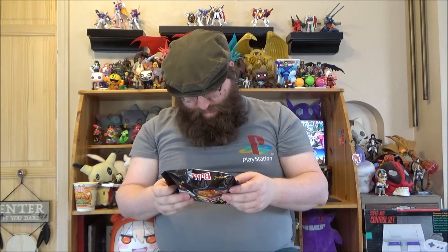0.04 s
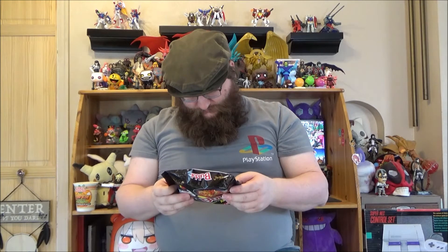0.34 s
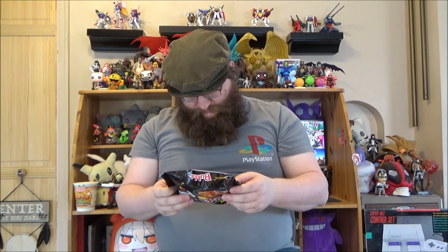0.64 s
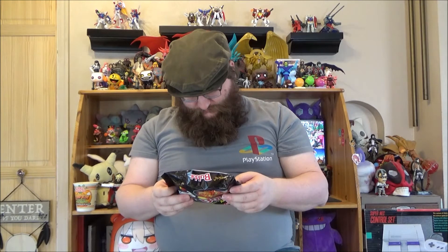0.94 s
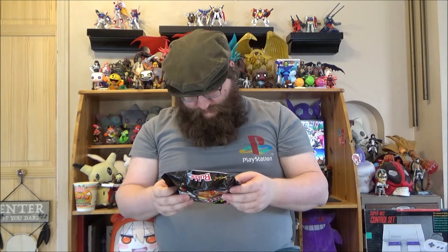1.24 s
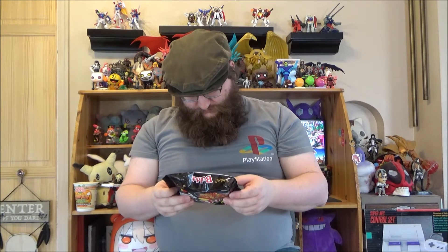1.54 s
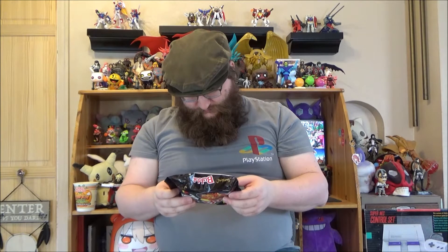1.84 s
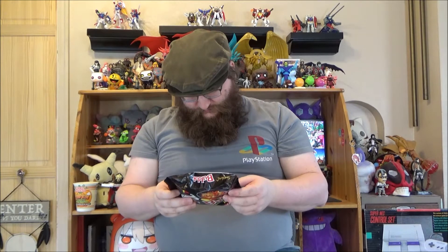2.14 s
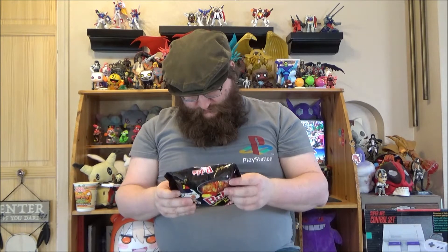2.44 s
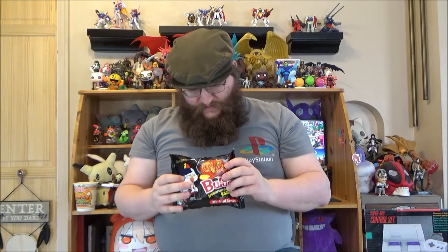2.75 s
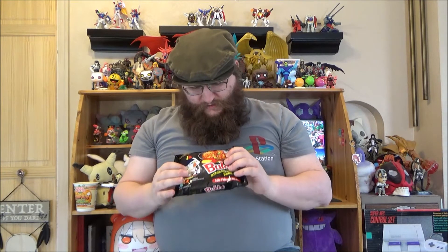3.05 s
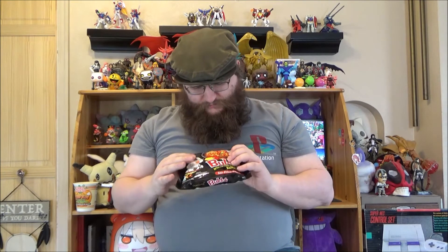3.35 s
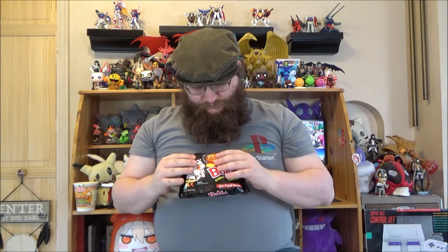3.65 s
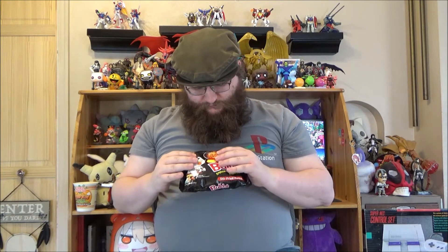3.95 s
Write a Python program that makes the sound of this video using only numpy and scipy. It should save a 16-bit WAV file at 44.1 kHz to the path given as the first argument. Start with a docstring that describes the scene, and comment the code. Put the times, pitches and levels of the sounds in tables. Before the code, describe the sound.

A plastic noodle packet crinkles in someone's hands, about a metre away in a small room. The first second holds only a few faint ticks. From about 1.3 seconds, scattered crisp snaps and soft fingertip taps gather. Around 2.3 seconds the crackling turns loud and dense with dull rubbing, eases near 3 seconds, then swells again from 3.4 to 4 seconds. Faint hiss and hum lie underneath.

```python
"""A small furnished room: a plastic noodle packet is gripped, then turned and squeezed about a metre away.
Creases in the film snap through one by one and ring the air-filled bag. Harder handling adds a dense
crackle of tiny creases and a dull rub of fingers and noodle block. Two snaps and three fingertip taps
give soft dull knocks. Behind it are soft hiss, mains hum and a faint pulsing electronic whine."""
import sys
import numpy as np
from scipy import signal
from scipy.fft import rfft, irfft
from scipy.io import wavfile
from scipy.ndimage import uniform_filter1d

SR = 44100
rng = np.random.default_rng(int(sys.argv[2]) if len(sys.argv) > 2 else 0)


def to_wav(sig):
    """Store sig (one row per channel, or 1-D mono) as 16-bit WAV at the path in sys.argv[1].

    Samples outside -1..1 are clipped; the rate is SR.
    """
    pcm = np.clip(np.atleast_2d(sig), -1, 1) * 32767
    pcm = np.round(pcm).astype(np.int16)
    wavfile.write(sys.argv[1], SR, pcm.T)  # frames by channels


N = 176400

# how hard the film is worked: time_s, effort_db
FILM_EFFORT = [(0, -48.5), (.035, -41), (.06, -47), (1.29, -52.5), (1.885, -60), (1.90, -21), (1.95, -62),
               (2.08, -55), (2.14, -36.5), (2.39, -45), (2.44, -66), (2.515, -43), (2.555, -18.5),
               (2.59, -24), (2.635, -28.5), (2.70, -29), (2.76, -37), (2.84, -27.5), (2.93, -35),
               (3.11, -33.5), (3.195, -38.5), (3.245, -30), (3.32, -38), (3.395, -50), (3.42, -28.5),
               (3.48, -22.5), (3.57, -32), (3.69, -27), (3.76, -28), (3.89, -39), (3.92, -26.5),
               (3.97, -43.5), (4, -37)]
# bands of the four sizes of tiny crease: edge_hz
CREASE_EDGES_HZ = [100, 1300, 3000, 6500, 17000]
# crackle spectrum: freq_hz, relative_db
CRACKLE_SPECTRUM = [(100, -36), (280, -23.5), (380, -4), (1150, -4.5), (1900, -1), (4500, -2.5),
                    (8500, -5.5), (10500, -11), (13000, -19), (16000, -50)]
# resonances of the air-filled bag: freq_hz, width_hz, relative_db
BAG_RESONANCES = [(420, 90, -7), (775, 80, -6), (1940, 240, -7), (2260, 90, -9)]
# fingers and noodle block on the film: time_s, relative_db
RUB_ENVELOPE = [(0, -67), (.07, -66), (1.3, -71.5), (1.77, -55.5), (2.06, -59), (2.17, -48), (2.4, -52.5),
                (2.48, -53), (2.58, -36.5), (2.77, -56.5), (2.88, -46), (3.19, -59), (3.38, -49.5),
                (3.46, -45.5), (3.7, -35.5), (3.85, -43), (4, -51)]
# soft dull knocks, the low body of two crease snaps, then three fingertip taps: start_s, level_db
DULL_KNOCKS = [(.267, -39.5), (1.47, -46), (1.577, -38.5), (1.808, -42), (1.827, -36)]
# rub and knock spectrum: freq_hz, relative_db
RUB_SPECTRUM = [(100, -13), (200, -12), (280, -17.5), (370, 4.5), (490, 4), (600, -7.5), (770, 3.5),
                (1100, -2.5), (2000, -2.5), (8000, -20.5)]
# room air spectrum: freq_hz, relative_db
AIR_SPECTRUM = [(20, -43), (64, -6), (92, -21.5), (123, 0), (153, -7), (249, -13), (309, -17), (887, -21),
                (1840, -25), (3920, -28.5), (16000, -36.5)]
# room air stereo width: freq_hz, side_to_mid_db
AIR_SPREAD = [(60, -37), (170, -17), (600, 0), (4400, -2), (12000, -22)]
# appliance hum: freq_hz, rms_db
HUM_TONES = [(120, -60.5), (250, -65), (900, -69.5)]
# creases snapping through: start_s, level_db, pitch_hz
CREASE_SNAPS = [(.0026, -31, 3350), (.018, -31.5, 4140), (0.0258, -27.5, 3700), (0.2667, -32, 6900),
                (0.7201, -50, 2200), (0.7419, -41, 2870), (1.309, -41, 4300), (1.3485, -45.5, 7050),
                (1.3888, -35, 5860), (1.4681, -33.5, 5840), (1.564, -34.5, 2470), (1.5742, -41.5, 1920),
                (1.696, -25.5, 3700), (1.7557, -36, 4130), (1.8209, -34, 6700), (1.8956, -24, 4930),
                (1.9272, -27, 3460), (1.9792, -33.5, 2700), (2.09, -32.5, 1830), (2.1149, -27.5, 5400),
                (2.1753, -28, 3850), (2.185, -27.5, 5570), (2.2432, -26.5, 4070), (2.2922, -31.5, 6540),
                (2.3180, -22.5, 2650), (2.3384, -16.5, 7460), (2.3776, -25, 4050), (2.3972, -22.5, 3950),
                (2.4987, -26.5, 3160), (2.5403, -24, 4200), (2.548, -22.5, 6800), (2.5524, -23.5, 11000),
                (2.5566, -20.5, 2290), (2.564, -18.5, 3620), (2.5743, -17, 3250), (2.5913, -19.5, 2380),
                (2.597, -17.5, 4400), (2.6457, -15, 9400), (2.6648, -12.5, 7200), (2.6807, -14.5, 4460),
                (2.6989, -19, 8500), (2.7028, -15, 8300), (2.769, -35.5, 11500), (2.852, -23.5, 6900),
                (2.877, -22.5, 6200), (2.8872, -24, 4960), (2.9493, -24, 4000), (2.9789, -22.5, 3700),
                (3.0315, -32.5, 2080), (3.0700, -17.5, 3700), (3.153, -23.5, 5500), (3.2154, -31.5, 5100),
                (3.308, -31.5, 3580), (3.3415, -25.5, 6100), (3.4074, -14.5, 5500), (3.4164, -19.5, 4140),
                (3.5087, -15.5, 3270), (3.5271, -19.5, 8200), (3.5598, -20, 3080), (3.6078, -19.5, 5400),
                (3.6186, -40, 4500), (3.6388, -12.5, 5170), (3.6533, -18, 8000), (3.6555, -17.5, 8200),
                (3.680, -19, 3100), (3.686, -15.5, 3550), (3.7031, -17, 3300), (3.7102, -14, 5630),
                (3.7514, -23, 5600), (3.7552, -16, 5200), (3.7633, -15.5, 7650), (3.7682, -19, 2620),
                (3.8027, -13, 8050), (3.8085, -17.5, 5600), (3.8429, -18, 4600), (3.8645, -24.5, 3500),
                (3.8816, -21, 10500), (3.9038, -13.5, 7700), (3.9396, -25, 5860)]
# spectrum common to all snaps: freq_hz, relative_db
SNAP_SPECTRUM = [(100, -20), (300, -2), (700, 1), (1200, 2), (1900, 6), (2800, 0.5), (4500, -4),
                 (8500, -1.5), (10500, -3), (13000, -9.5), (16000, -25)]
# broad and narrow peaks at a buckling facet's pitch: boost_db, width_octaves
FACET_PEAKS = [(9, 1.2), (8, .2)]
# room tail: freq_hz, t60_s, level_db, side_to_mid_db
ROOM_BANDS = [(302, 0.61, -4.5, -36), (597, 0.42, 0.5, -13), (1880, 0.2, -3.5, -8), (4320, 0.34, -4, -6),
              (9600, 0.23, -8, -20), (15200, .18, -40, -8)]

REST_START_S, REST_END_S = .07, 1.29
CRACKLE_GAIN_DB, RUB_GAIN_DB, SNAP_GAIN_DB = -3, 5, .05
CRACK_DECAY_S, SHIVER_DECAY_S, SHIVER_DB = .0007, .0019, -3
WHINE_HZ, WHINE_RATE_HZ, WHINE_FIRST_S, WHINE_WIDTH_S, WHINE_PEAK_DB = 3213, 29.92, .018, .0016, -56
ROOM_ONSET_S, EARLY_DECAY_S, DIRECT_SIDE_DB = .004, .012, -14


def undb(db):
    """Decibels to gain."""
    return 10 ** (np.asarray(db) / 20)


def curve(points, t):
    """Linear interpolation of (time_s, value) points."""
    return np.interp(t, *np.array(points).T)


def spectrum_db(points, hz):
    """Interpolation of (freq_hz, db) points on a log frequency axis."""
    point_hz, db = np.array(points).T
    return np.interp(np.log(hz + 1), np.log(point_hz), db)


def colour(x, points, size=2048):
    """Minimum-phase, unit-energy filter shaped by (freq_hz, db) points."""
    cepstrum = irfft(np.log(undb(spectrum_db(points, np.fft.rfftfreq(size, 1 / SR)))))
    cepstrum[1:size // 2] *= 2
    cepstrum[size // 2 + 1:] = 0
    impulse = irfft(np.exp(rfft(cepstrum)))
    return signal.fftconvolve(x, impulse / np.linalg.norm(impulse))[:len(x)]


def grains(rate_hz, scatter_db, decay_s):
    """Random tiny noise bursts of scattered size, mean power near 1."""
    chance, size, noise = rng.random(N), rng.standard_normal(N), rng.standard_normal(N)
    power = undb(scatter_db * np.minimum(size, 2)) ** 2
    hits = (chance < rate_hz / SR) * power / power.mean() * SR / rate_hz
    pole = np.exp(-2 / (decay_s * SR))
    return noise * np.sqrt(signal.lfilter([1 - pole], [1, -pole], hits + 1e-12))


def hands_moving(t):
    """1 while the hands move, 0 while they rest."""
    return (t < REST_START_S) | (t > REST_END_S)


def crackle(t):
    """Tiny creases come faster and louder with effort. One signal per crease size, dull to bright."""
    effort_db = curve(FILM_EFFORT, t)
    rate_hz = 800 * np.exp(.01 * (effort_db + 30))
    gain = undb(effort_db + CRACKLE_GAIN_DB) * hands_moving(t)
    bands = []
    for edges_hz in zip(CREASE_EDGES_HZ, CREASE_EDGES_HZ[1:]):
        bandpass = signal.butter(2, edges_hz, "band", fs=SR, output="sos")
        bands.append(signal.sosfilt(bandpass, gain * grains(rate_hz, scatter_db=5, decay_s=.0009)))
    return [bag_ring(colour(band, CRACKLE_SPECTRUM), ring_db=-3) for band in bands]


def bag_ring(clicks, ring_db):
    """Clicks plus the bag's resonances, tuned a little higher or lower at random as grip varies."""
    tune = 1 + .045 * rng.uniform(-.95, 1)
    ring = sum(undb(db) * signal.lfilter(*signal.iirpeak(hz * tune, hz / width_hz, fs=SR), clicks)
               for hz, width_hz, db in BAG_RESONANCES)
    return clicks + undb(ring_db) * ring


def rub_and_knocks(t, knock_decay_s=.006):
    """Fingers and noodles scrape the film in grains; two snaps and three fingertip taps knock dully."""
    gain = undb(curve(RUB_ENVELOPE, t) + RUB_GAIN_DB) * hands_moving(t)
    scrape = gain * grains(rate_hz=1100, scatter_db=6, decay_s=.0012)
    knock_envelope = sum(undb(db) * (t >= start_s) * np.exp(-np.clip(t - start_s, 0, 1) / knock_decay_s)
                         for start_s, db in DULL_KNOCKS)
    return colour(scrape + knock_envelope * rng.standard_normal(N), RUB_SPECTRUM)


def room_air(mid_rms_db=-52.5):
    """Steady soft hiss over a low rumble, near mono in the bass."""
    hz = np.fft.rfftfreq(N, 1 / SR)
    mid_bins, side_bins = rfft(rng.standard_normal((2, N))) * undb(spectrum_db(AIR_SPECTRUM, hz))
    mid = irfft(mid_bins)
    side = irfft(side_bins * undb(spectrum_db(AIR_SPREAD, hz)))
    return np.array([mid + side, mid - side]) * undb(mid_rms_db) / np.sqrt(np.mean(mid ** 2))


def mains_hum(t):
    """Appliances hum in steady tones."""
    return sum(np.sqrt(2) * undb(db) * np.sin(2 * np.pi * (hz * t + rng.random()))
               for hz, db in HUM_TONES)


def snaps(size=768, tail_size=10000):
    """A crease cracks, then its facet shivers at its own pitch; each takes a new path through the room."""
    out = np.zeros((2, N + tail_size))
    t = np.arange(size) / SR
    envelope = np.exp(-t / CRACK_DECAY_S) + undb(SHIVER_DB) * np.exp(-t / SHIVER_DECAY_S)
    hz = np.geomspace(100, 16000, 90)
    for start_s, level_db, pitch_hz in CREASE_SNAPS:
        buckle = rng.standard_normal(size) * envelope
        power = uniform_filter1d(np.abs(rfft(buckle)) ** 2, 20)
        flatten_db = -10 * np.log10(np.interp(hz, np.fft.rfftfreq(size, 1 / SR), power))
        facet_db = sum(boost_db * np.exp(-.5 * (np.log2(hz / pitch_hz) / width_octaves) ** 2)
                       for boost_db, width_octaves in FACET_PEAKS)
        snap = colour(buckle, np.c_[hz, spectrum_db(SNAP_SPECTRUM, hz) + facet_db + flatten_db])
        snap = bag_ring(np.pad(snap, (0, tail_size - size)), ring_db=-6)
        snap /= np.sqrt(np.sum(snap ** 2) / (.003 * SR))  # energy of 3 ms at unit power
        first = int(start_s * SR)
        out[:, first:first + tail_size] += undb(level_db + SNAP_GAIN_DB) * room(snap, tail_size)
    return out[:, :N]


def whine(t):
    """Faint electronic tone pulses, about thirty a second."""
    from_peak_s = (((t - WHINE_FIRST_S) * WHINE_RATE_HZ + .5) % 1 - .5) / WHINE_RATE_HZ
    pulse = np.exp(-.5 * (from_peak_s / WHINE_WIDTH_S) ** 2)
    return undb(WHINE_PEAK_DB) * pulse * np.sin(2 * np.pi * WHINE_HZ * from_peak_s)


def room(x, size=24000):
    """Direct sound, dense early reflections off shelves, then a short tail, longest in the bass."""
    t, hz = np.arange(size) / SR, np.fft.rfftfreq(size, 1 / SR)
    noise_bins = rfft(rng.standard_normal((2, size)))
    onset = np.clip(2 * t / ROOM_ONSET_S - 1, 0, 1)
    early_boost = 1 + np.exp(-t / EARLY_DECAY_S)
    log_centres = np.log([band[0] for band in ROOM_BANDS])
    impulse = np.zeros((2, size))  # mid, side
    for selector, (_, t60_s, level_db, side_db) in zip(np.eye(len(ROOM_BANDS)), ROOM_BANDS):
        band_noise = irfft(noise_bins * np.interp(np.log(hz + 1), log_centres, selector))
        fade = onset * early_boost * undb(-60 * t / t60_s)
        impulse += band_noise * fade / np.linalg.norm(fade) * undb([[level_db], [level_db + side_db]])
    impulse[0, 1] += 1
    # direct sound reaches one microphone port slightly earlier
    impulse[1, [0, 3]] += undb(DIRECT_SIDE_DB) * rng.choice([-1, 1]) * np.array([.5, -.5])
    mid, side = signal.fftconvolve(x[None], impulse, axes=1)[:, :len(x)]
    return np.array([mid + side, mid - side])


def scene():
    """Snaps, crackle and rubbing, each by its own room paths, over air, hum and whine."""
    t = np.arange(N) / SR
    packet = snaps() + sum(room(band) for band in crackle(t)) + room(rub_and_knocks(t))
    return packet + room_air() + mains_hum(t) + whine(t)


def record(dry, ceiling=.9, cutoff_hz=15900):
    """Hard limit near full scale, then a steep low-pass."""
    lowpass = signal.ellip(10, .1, 80, cutoff_hz, fs=SR, output="sos")
    return signal.sosfilt(lowpass, np.clip(dry, -ceiling, ceiling))


dry = scene()
out = record(dry)
to_wav(out)
```